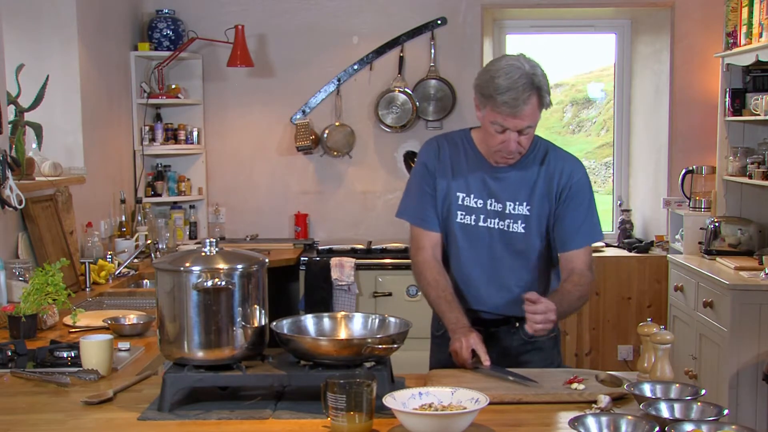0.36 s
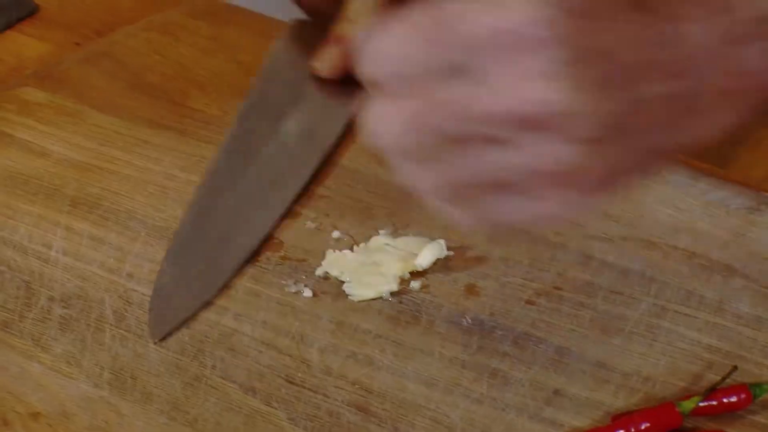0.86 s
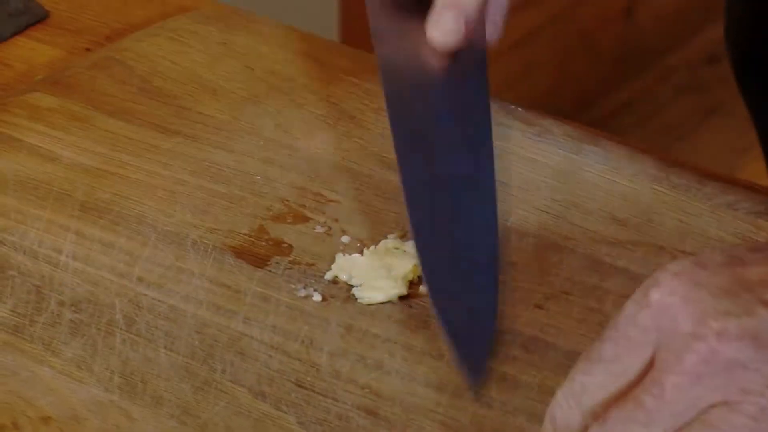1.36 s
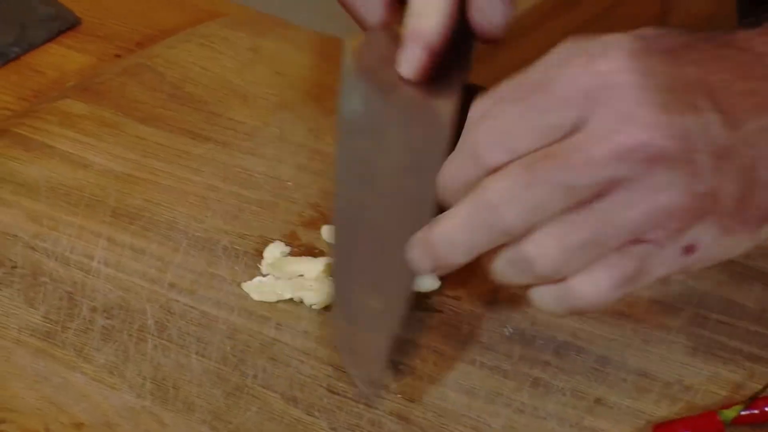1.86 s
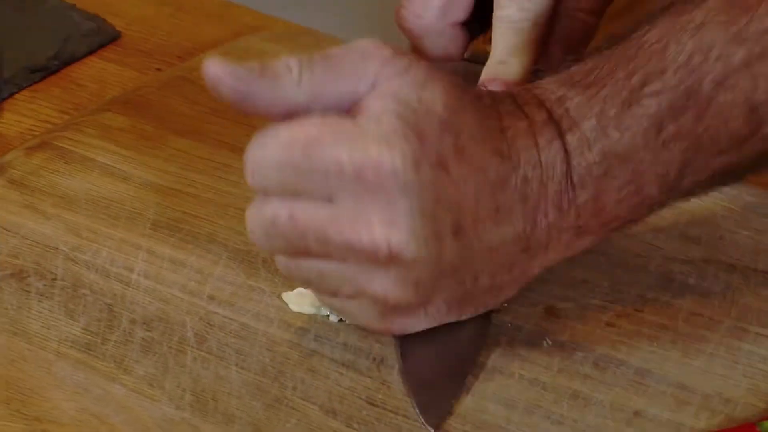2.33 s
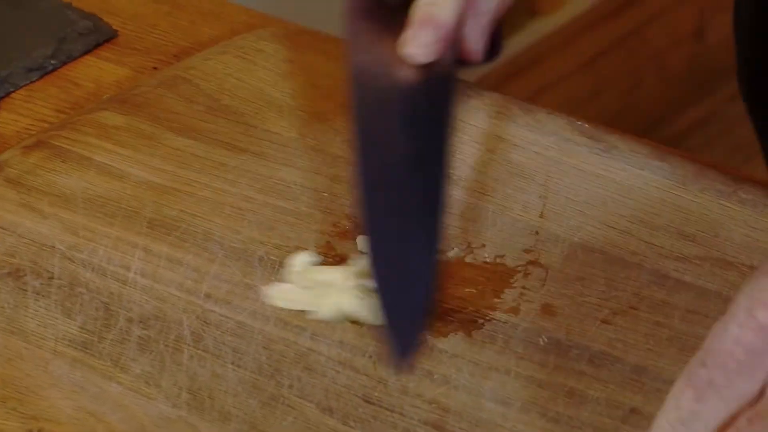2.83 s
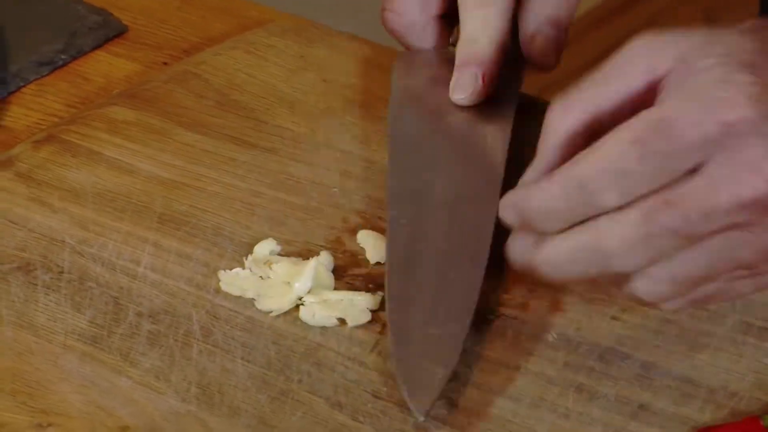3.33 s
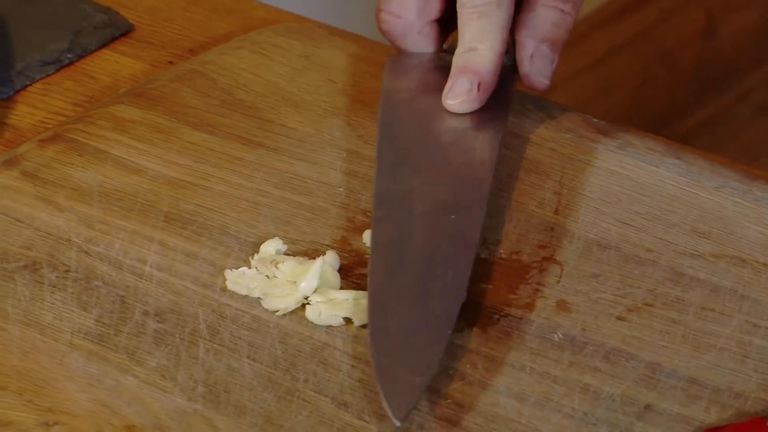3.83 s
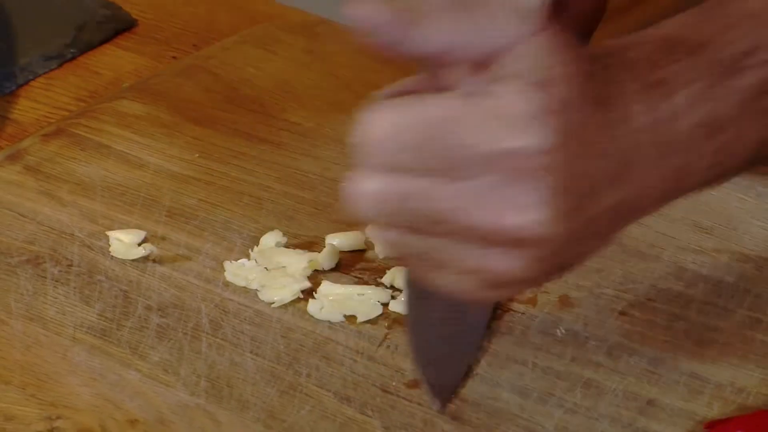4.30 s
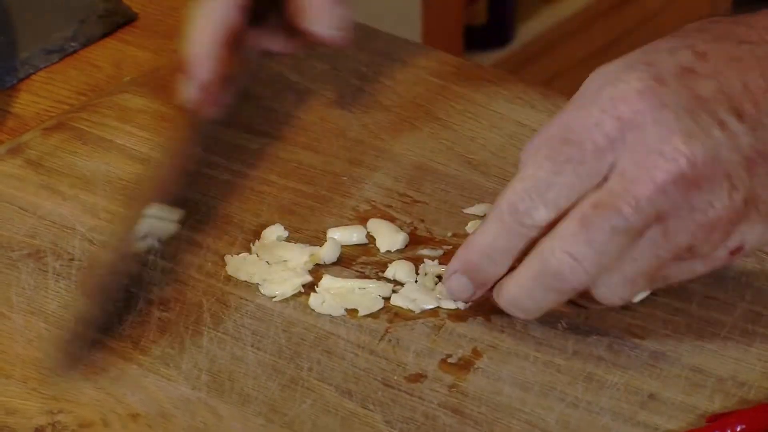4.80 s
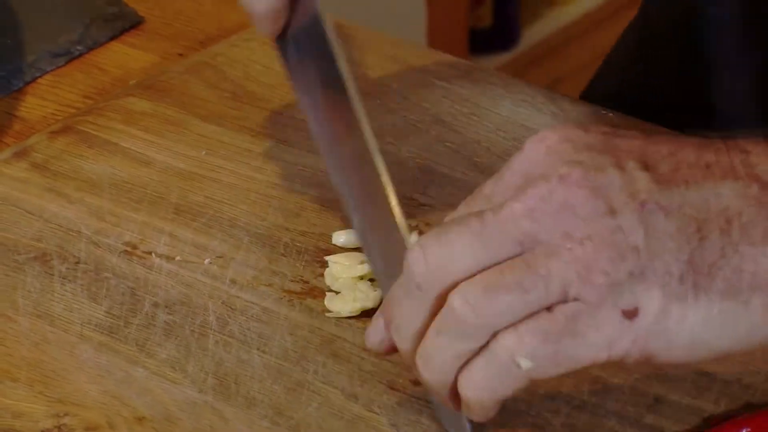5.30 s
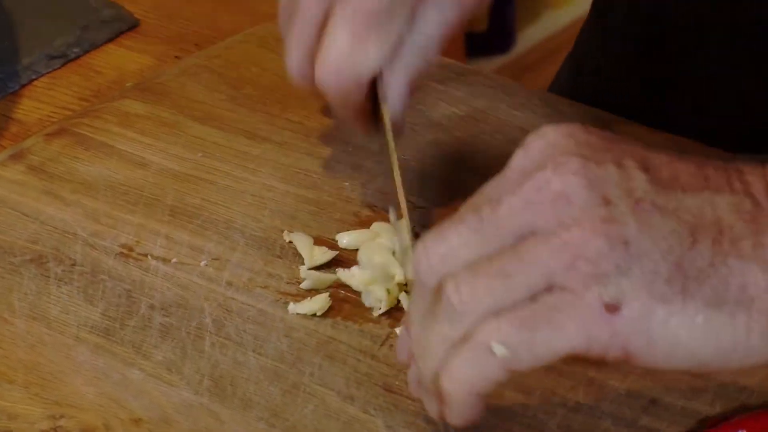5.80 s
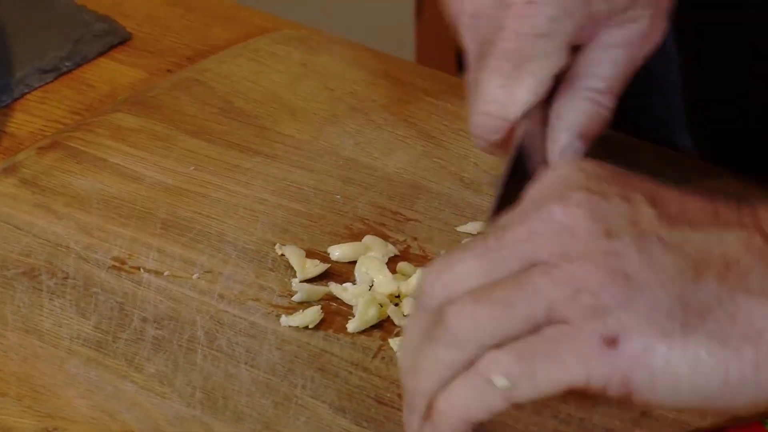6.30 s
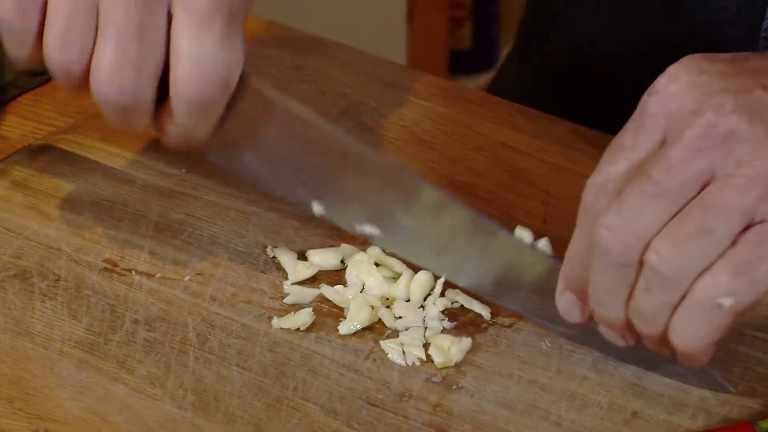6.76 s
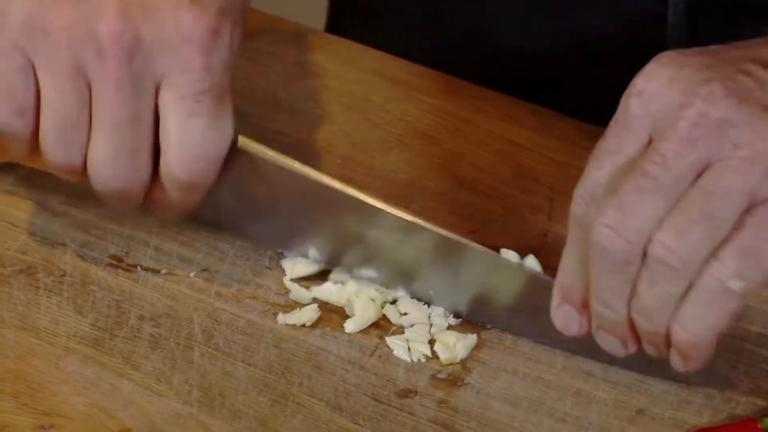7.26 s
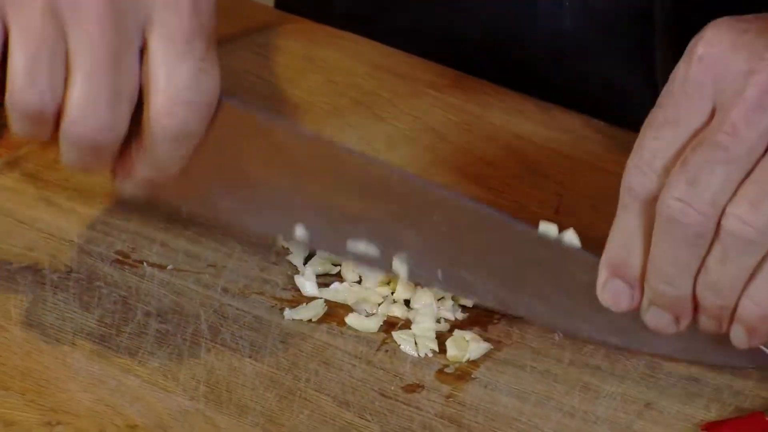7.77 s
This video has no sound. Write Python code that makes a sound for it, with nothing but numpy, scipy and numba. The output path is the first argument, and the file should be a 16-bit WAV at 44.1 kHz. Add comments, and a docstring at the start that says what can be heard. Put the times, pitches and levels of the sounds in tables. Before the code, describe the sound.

A quiet kitchen with faint hiss, miked close, with only slight reflections from the walls. A soft touch at 0.2 s, then at 0.64 s a fist slams the flat of a knife onto garlic: a loud crack and woody thump, metal bowls clinking brightly just after. Light taps at 0.9; a sharp bladed click and short scrape around 1.45-1.55. A second smash at 2.34, with bowl jingle, then a tap, a soft scrape near 2.9 and small quiet touches. The third smash lands at 4.2. A firm clack at 4.8 and gritty sliding of the edge from 4.85 to 5.15 follow as garlic is gathered. Chops knock at 5.5, 5.7, 6.0 and 6.36, with a tight cluster of clacks and a brief metallic scrape around 6.55-6.7. Five even, crisp chops run from 6.96 to 7.66, faint clinks among them, ending on a weak touch at 7.84.

```python
"""In a kitchen, a fist smashes garlic under the flat of a chef's knife, then the blade chops it on a wooden board.
Blows and touches mix crushing and clicking noise with fading tones of board, worktop and steel.
Nested bowls clink as bright noise and ringing; the sliding edge is uneven noise through the blade's resonances.
The walls echo it faintly over quiet room noise and wavering tones, and a look-ahead limiter holds the peaks."""
import sys
import numpy as np
from scipy import signal
from scipy.fft import rfft, irfft, next_fast_len
from scipy.io import wavfile
from scipy.ndimage import uniform_filter1d, minimum_filter1d
from numba import njit

SR = 44100
rng = np.random.default_rng(int(sys.argv[2]) if len(sys.argv) > 2 else 0)


def invert_db(level):
    """Linear amplitude ratio for a level in decibels (20 dB per decade), elementwise."""
    return 10 ** (np.asarray(level, dtype=float) / 20)


def wav_record(signal):
    """Record a signal, one row per channel, as 16-bit PCM in the file named by sys.argv[1]."""
    frames = np.transpose(np.atleast_2d(signal))
    bounded = np.clip(frames, -1, 1)
    # unit amplitude maps onto the largest positive 16-bit level
    quanta = np.round(bounded * 32767).astype(np.int16)
    wavfile.write(sys.argv[1], SR, quanta)


N = 347596  # length in samples

# Quiet room noise: f/Hz, level per Hz/dB (only the shape counts)
AIR_SHAPE = [(15, -95), (25, -19.5), (127, 4), (309, -8), (344, -4.5), (545, -19.5), (2110, -18.5),
             (2480, -18), (2760, -16.5), (7310, -23.5), (9070, -19.5), (16000, -36.5)]
# Faint wavering tones: f/Hz, level/dB
HUM_TONES = [(134.6, -85), (2778, -82.5), (4194, -81), (4990, -86), (9060, -81.5)]
# Blade or fingers touching down: t/s, whole touch/dB, worktop boom/dB, board thump/dB, treble/dB (-11 is neutral)
TOUCHES = [(0.232, -42, -22, -12, -12), (0.855, -19.5, -39.5, -24, -2), (0.882, -19, -21, -22, 4),
           (1.401, -45, -20, -19, -18), (1.447, -6.5, -33, -31, 6.5), (1.677, -28.5, -40, -21.5, -11),
           (1.946, -60, 7, -5, -19), (2.541, -15, -25, -44, -4.5), (2.703, -44.5, 0, -3.5, -12),
           (2.733, -32, -34, -40, -48.5), (3.117, -34.5, -39, -13, -9), (3.389, -41.5, -4, -8, -7),
           (3.957, -66, 18, 2, -9), (4.793, -4.5, -22.5, -25.5, -11), (5.085, -27, -35, -32, 8),
           (5.105, -20.5, -30, -31, 7), (5.309, -43, -33, -11, 1), (5.325, -41, -15, -20, 2),
           (5.83, -20, -9.5, -11, 4), (6.183, -19, -41, -21.5, -4.5), (6.541, -6, -24, -18.5, -18.5),
           (6.586, -9.5, -21.5, -23, -6), (6.608, -8, -24, -25, -67), (7.836, -37, -15, -9.5, -43)]
# Click of a touch: f/Hz, level per Hz/dB
TOUCH_COLOUR = [(59, -17), (100, -9), (1610, 11), (2630, 13.5), (3190, 9.5), (4770, 0.5), (7290, -7.5),
                (14100, -24.5), (16000, -49)]
# Tones of the worktop: f/Hz, level/dB, time to fade 60 dB/s
WORKTOP_TONES = [(135.6, -1.5, 0.16), (80.8, -29, 0.54)]
# Tones of the wooden board: f/Hz, level/dB before the edge's tilt, time to fade 60 dB/s
BOARD_TONES = [(189.8, -9, 0.29), (247.7, -6.5, 0.14), (289.7, -15, 0.29), (359, -16.5, 0.22),
               (417, -0.5, 0.09), (466.4, -2, 0.056), (594.5, -8.5, 0.073)]
# Pans and blade set ringing: f/Hz, level/dB, time to fade 60 dB/s
STEEL_TONES = [(1104, -17, 1.77), (1913, 0, 0.62), (2140, -9.5, 0.44), (2240, -24, .1), (2560, -10, 1.3),
               (2710, -13.5, 1), (3290, -15.5, 1.3), (3330, -13.5, 0.97), (3880, -7, 0.56),
               (4380, -15, 0.87), (5056, -13.5, 0.63)]
# Board, worktop and dishes shaking on after a blow: f/Hz, time to fade 60 dB/s, relative level/dB
SHAKING = [(270, 0.65, 13.5), (429, 0.47, 10), (980, 0.46, 3), (2125, 0.53, 2.5), (4120, 0.76, -3),
           (7670, 1, -4), (14000, 0.17, 14)]
# Garlic being crushed: f/Hz, level per Hz/dB
CRUSH_COLOUR = [(300, -9.5), (1500, -1), (3000, -4.5), (7000, -3.5), (12000, -13), (16000, -49)]
# Dense kitchen echo: f/Hz, time to fade 60 dB/s, relative level/dB
ROOM_ECHO = [(250, .4, -20), (500, .45, -20), (1000, .5, -20), (2000, .5, -20), (4000, .5, -20),
             (8000, .4, -20), (14000, .3, -22)]
# First echo: delay/ms, level/dB, heard above f/Hz
WALL_ECHO = [(6, -12, 200)]
# Fist on the flat blade: t/s, worktop boom/dB, board thump/dB, treble/dB (-11 is neutral), steel ringing/dB
FIST_BLOWS = [(0.643, -23, -19, -12.5, -48), (2.338, -22, -27.5, -13.5, -46.5),
              (4.198, -17, -20.5, -15, -41)]
# Crack of a smash: f/Hz, level per Hz/dB
SMASH_COLOUR = [(180, -10), (300, -11.5), (1410, -9.5), (2280, -3), (4830, -7.5), (5430, -5.5),
                (11700, -17), (16000, -31.5)]
# Further bowl clinks, each at its own moment, one very faint: t/s, level/dB
FURTHER_CLINKS = [(0.8045, -54), (2.4578, -34), (4.342, -32), (5.7458, -33), (5.894, -33), (5.9883, -36),
                  (6.2891, -36), (6.4622, -30.5), (6.567, -29), (7.2439, -36), (7.266, -29.5)]
# Tones of the bowls: f/Hz, level/dB, time to fade 60 dB/s
BOWL_TONES = [(4398, 0, .5), (5146, -2.5, 0.41), (5846, -6, 0.21), (5700, -8, 0.29), (6352, -18, 0.42),
              (6660, 5, .15), (7215, -2.5, 0.27), (8200, -4.5, 0.2), (9001, -5.5, 0.35), (10200, -11, .25),
              (10100, -7, 0.29), (11036, -14.5, 0.24), (12200, -16, .2), (12460, -22, .2)]
# Edge sliding over board and garlic; near 4.63-4.755 s, faint dying steel ring, made the same way:
# t of the top/s, swell/s, fade/s, level/dB, treble against level/dB
# swell and fade each span 20 dB and last at least 0.003 s
STROKES = [(0.9, 0.0095, 0.023, -53.5, 21), (1.02, 0.087, 0.15, -47, -3.5), (1.127, 0.059, 0.082, -54, -31),
           (1.285, 0.03, 0.049, -71.5, 13.5), (1.405, 0.011, .09, -66, -23),
           (1.45, 0.0026, 0.014, -19.5, -6), (1.48, 0.026, 0.066, -33.5, -14),
           (1.535, 0.067, .05, -30, -13.5), (1.62, .05, 0.17, -47.5, -14), (1.79, 0.027, 0.023, -84.5, 17),
           (2.57, 0.051, 0.2, -49.5, -2), (2.746, 0.017, 0.07, -51, -23), (2.908, .11, 0.067, -27, -20),
           (3.02, 0.092, 0.084, -57, -8), (3.13, 0.019, 0.1, -61, 0), (3.44, 0.023, 0.095, -70, 4),
           (4.501, 0.068, 0.082, -49.5, 6), (4.63, .07, 0.17, -58.5, 0), (4.755, 0.026, 0.016, -65, -21),
           (4.871, 0.056, 0.091, -33, 0), (4.95, 0.13, 0.037, -28, -4.5), (5.01, 0.054, 0.088, -49, -3),
           (5.137, 0.063, 0.026, -35, 4), (5.3, 0.15, 0.048, -61.5, 0.5), (5.47, 0.15, 0.034, -56, 0),
           (6.3, 0.023, 0.052, -51.5, 3.5), (6.64, 0.033, 0.05, -41, 12.5),
           (6.684, 0.072, 0.046, -32.5, 4.5)]
# A hand pushing over the board, heard as rumble only: t/s, swell/s, fade/s, level/dB
HAND_PUSHES = [(5.208, 0.089, 0.044, -41)]
# Blade resonances: f/Hz, width/Hz (held to 45-110), level/dB
BLADE_TONES = [(1850, 70, -1), (2210, 60, -2), (2360, 110, -1), (2710, 61, -1), (3110, 60, -4),
               (3770, 92, -8), (4480, 140, -6), (5160, 42, -6), (5340, 25, -6), (6050, 110, -10),
               (6940, 110, -12), (7420, 60, -9), (9420, 72, -12)]
# Middle of the blade's two squeaks: f/Hz
SQUEAK_PITCHES = (2390, 4240)
# Drift of each squeak: share of its pitch
SQUEAK_DRIFTS = (0.14, 0.051)
# Rasp of the edge: f/Hz, level per Hz/dB
RASP_COLOUR = [(240, -57.5), (400, -29), (979, -8.5), (1230, 4.5), (1600, -18.5), (2290, -41), (3580, -4),
               (9760, -6), (16000, -40.5)]
# Edge down through the garlic onto the board: t/s, worktop boom/dB, board thump/dB, treble/dB (-11 is neutral), contact/ms
EDGE_BLOWS = [(5.496, -27, -25, -16.5, 11.4), (5.676, -23.5, -29.5, -15, 2.8),
              (6.002, -19, -25.5, -17, 8.7), (6.36, -17.5, -20.5, -14, 19.5),
              (6.957, -25, -23.5, -16.5, 12.5), (7.136, -23, -23, -18, 10.3), (7.307, -29, -27, -17.5, 8.5),
              (7.48, -28.5, -24.5, -17, 8.6), (7.66, -29, -22.5, -19, 12)]
# Knock of a chop: f/Hz, level per Hz/dB
CHOP_COLOUR = [(59, -60), (100, -15), (535, 12.5), (784, 19), (1550, 20), (2420, 16.5), (3780, 13),
               (5650, 9.5), (8280, -2.5), (16000, -44)]


def unit(x):
    """Scale to rms 1."""
    return x / np.sqrt(np.mean(x ** 2))


def colour(x, points):
    """Shape the loudness of each pitch by (f/Hz, level/dB) points."""
    hz, db = np.transpose(points)
    n = next_fast_len(x.shape[-1])
    f = np.maximum(np.arange(n // 2 + 1) * SR / n, 1)
    gain = invert_db(np.interp(np.log(f), np.log(hz), db))
    return irfft(rfft(x, n) * gain, n)[..., :x.shape[-1]]


def band(x, hz, width_hz):
    """One resonance, which passes its centre pitch unchanged."""
    return signal.lfilter(*signal.iirpeak(hz, hz / max(width_hz, 5), SR), x)


def walk(rate):
    """Smooth random drift with a new aim `rate` times a second; spread near 1."""
    hold = int(SR / rate)
    steps = np.repeat(rng.standard_normal(N // hold + 1), hold)
    return 1.35 * uniform_filter1d(uniform_filter1d(steps, hold), hold)[:N]


def air():
    """Room noise whose bass wavers, plus narrow bands of noise heard as faint tones."""
    noise = unit(colour(rng.standard_normal(N), AIR_SHAPE))
    bass = signal.sosfilt(signal.butter(2, 450, fs=SR, output="sos"), noise)
    wavering_bass = bass * invert_db(3 * walk(5.3))
    tones = np.zeros(N)
    for hz, db in HUM_TONES:
        tones += invert_db(db + 2 * walk(4.4)) * unit(band(rng.standard_normal(N), hz, 29))
    return invert_db(-64) * (noise - bass + wavering_bass) + tones


def ring(modes, t, scatter_db, rattle, detune=0.0088, size=400):
    """Fading tones; each blow wakes them unevenly, and loose contact makes them rattle instead of sing."""
    hz, db, t60 = np.transpose(modes)[:, :, None]
    uneven, off_pitch = rng.standard_normal((2, len(modes), 1))
    wobble = uniform_filter1d(rng.standard_normal((len(modes), len(t))), size=size, axis=1)
    shake = 1 + rattle * unit(wobble)
    fade = np.exp(-np.log(1000) * t / np.clip(t60, .02, 2))
    tones = np.sin(2 * np.pi * hz * (1 + detune * off_pitch) * t)
    return (invert_db(db + scatter_db * uneven) * shake * fade * tones).sum(axis=0)


def fading(bands, t):
    """Noise that dies at its own pace in each octave-wide band."""
    out = 0
    for hz, t60, db in bands:
        limits = (hz / np.sqrt(2), min(hz * np.sqrt(2), SR * 9 / 20))
        octave = signal.butter(2, limits, "band", fs=SR, output="sos")
        noise = signal.sosfilt(octave, rng.standard_normal(len(t)))
        out = out + invert_db(db) * noise * np.exp(-np.log(1000) * t / t60)
    return out


def blows(events, spectrum, crack_db, clatter_db, crush_db, crush_ms, edge_db):
    """Garlic crushes just before each blow, a click and rattle follow the contact, then all it shook rings on."""
    out, t = np.zeros(N + SR), np.arange(SR * 3 // 5) / SR
    short_ms = t[:2048] * 1000
    lead = 256  # samples of room ahead of the click for its coloured noise
    # a hard narrow edge wakes the board's higher tones more than a soft fist: edge_db per octave
    board = [(hz, db + edge_db * np.log2(hz / BOARD_TONES[0][0]), t60) for hz, db, t60 in BOARD_TONES]
    tail_off = np.clip((t[-1] - t) * 12, 0, 1)
    for s, db, boom_db, thump_db, treble_db, contact_ms, steel_db in events:
        # the treble setting comes in between 2500 and 5000 Hz
        tilt = [(hz, g + (treble_db + 11) * np.clip(np.log2(hz / 2500), 0, 1)) for hz, g in spectrum]
        unevenness = 2 * rng.standard_normal((2, 2048 // 16)).repeat(16, axis=1)
        grit = rng.standard_normal((2, 2048)) * invert_db(unevenness)

        contact = grit[0] * np.exp(-(short_ms / max(contact_ms, .3)) ** 2)
        contact[0] = invert_db(12)  # the click
        crack = invert_db(crack_db) * unit(colour(np.roll(contact, lead), tilt))
        crush = invert_db(crush_db) * unit(colour(grit[1], CRUSH_COLOUR)) * np.exp(-(short_ms / crush_ms) ** 2)

        boom = invert_db(boom_db) * ring(WORKTOP_TONES, t, 1, 0)
        thump = invert_db(thump_db) * ring(board, t, 2.5, 1 / 3)
        # the harder the board jumps, the more the things on it shake
        clatter = invert_db(clatter_db + .5 * thump_db) * unit(colour(fading(SHAKING, t), tilt))
        steel = invert_db(steel_db) * ring(STEEL_TONES, t, 4.1, 0.95, detune=0, size=1200)
        body = (boom + thump + clatter) * (1 - np.exp(-t / 0.0058)) + steel

        i = int(s * SR)
        out[i - 2048:i] += invert_db(db) * crush[::-1]  # reversed, so it grows towards the blow
        out[i - lead:i - lead + 2048] += invert_db(db) * crack
        out[i:i + len(t)] += invert_db(db) * body * tail_off
    return out[:N]


def taps():
    """Blade or fingers touch down: short contacts, each with its own strength."""
    contact_ms, steel_db = 4.44, -52.5
    return blows([(*row, contact_ms, steel_db) for row in TOUCHES], TOUCH_COLOUR,
                 crack_db=-20.5, clatter_db=-27.5, crush_db=-47, crush_ms=4.5, edge_db=2.5)


def kitchen(x):
    """Direct sound, a near wall's echo and a faint dense tail of fading noise."""
    t = np.arange(SR * 3 // 5) / SR
    response = fading(ROOM_ECHO, t) * (1 - np.exp(-t / 0.0072)) / np.sqrt(SR / 28)
    response[0] = 1  # direct sound
    for ms, db, hz in WALL_ECHO:
        echo = signal.lfilter(*signal.butter(1, hz, "high", fs=SR), t[:256] == 0)
        response[ms * SR // 1000:][:256] += invert_db(db) * echo
    return signal.fftconvolve(x, response)[:N]


def smashes():
    """The fist is soft and broad, so it wakes the board's higher tones less."""
    level_db, contact_ms = 10, 11.2
    return blows([(s, level_db, *wood, contact_ms, steel) for s, *wood, steel in FIST_BLOWS], SMASH_COLOUR,
                 crack_db=-19.5, clatter_db=-35.0, crush_db=-49, crush_ms=3.3, edge_db=-1.5)


def clinks():
    """Nested bowls hop after each smash and chop: a first clink, then three weaker ones at chance moments."""
    hop_s, settle_s = .027, 0.24
    out = list(FURTHER_CLINKS)
    for table, hop_db in ((FIST_BLOWS, -18), (EDGE_BLOWS, -27.5)):
        for s, *_ in table:
            out.append((s + hop_s, hop_db))
            for _ in range(3):
                moment = s + hop_s + settle_s * rng.random()
                out.append((moment, -42.5 + 3 * rng.standard_normal()))
    return out


def bowls():
    """Each clink is a bright tick and a short fizz of noise, with the bowls' tones ringing."""
    out, t = np.zeros(N + SR), np.arange(SR // 3) / SR
    bright = signal.butter(2, (5500, 11500), "band", fs=SR, output="sos")
    for s, db in clinks():
        tick_and_fizz = np.exp(-t / 0.0029) + invert_db(-26) * np.exp(-t / 0.028)
        contacts = signal.sosfilt(bright, rng.standard_normal(len(t))) * tick_and_fizz
        ringing = ring(BOWL_TONES, t, 3.3, 0.85, detune=.002, size=500)
        out[int(s * SR):][:len(t)] += invert_db(db) * (invert_db(-24.5) * ringing + invert_db(-7) * contacts)
    return out[:N]


def hump(t, s, swell_s, fade_s):
    """Level in dB against the top of a stroke, which swells and then fades."""
    before = (s - t) / max(swell_s, .003)
    after = (t - s) / max(fade_s, .003)
    return -20 * np.where(t < s, before, after).clip(0, 9) ** 1.4  # power 1 is pointed, 2 rounded


@njit
def sweep(x, hz, sharp):
    """Resonance whose pitch moves, worked out sample by sample."""
    y, b, l = np.empty(len(x)), 0., 0.  # b, l: what the filter remembers
    for i in range(len(x)):
        g = np.tan(np.pi * hz[i] / SR)
        v = (b + g * (x[i] - l)) / (1 + g * (g + 1 / sharp))
        b, l, y[i] = 2 * v - b, l + 2 * g * v, v / sharp
    return y


def scrapes():
    """Dense uneven catches, as of the edge on wood grain, drive the blade's resonances and the board."""
    t = np.arange(N) / SR
    low_level, high_level, rumble_level = np.zeros((3, N))
    for s, swell_s, fade_s, db, treble_db in STROKES:
        on = slice(int((s - 2 * swell_s) * SR), int((s + 3 * fade_s) * SR))
        stroke = invert_db(hump(t[on], s, swell_s, fade_s))
        low_level[on] += invert_db(db) * stroke
        high_level[on] += invert_db(db + treble_db) * stroke
        # 12 dB under a -47.5 dB stroke; it grows more slowly than the rasp
        rumble_level[on] += invert_db(db - 12 - 0.69 * (db + 47.5)) * stroke
    for s, swell_s, fade_s, db in HAND_PUSHES:
        rumble_level += invert_db(db + hump(t, s, swell_s, fade_s))

    catches = rng.standard_normal(N) * invert_db(2.48 * rng.exponential(size=N) + 2.65 * walk(150))
    # grip and pressure change which resonances speak from moment to moment
    blade = np.zeros(N)
    for hz, width_hz, db in BLADE_TONES:
        blade += invert_db(db + 4 * walk(25)) * unit(band(catches, hz, np.clip(width_hz, 45, 110)))
    squeaks = [unit(sweep(catches, hz * np.exp(share * walk(15)), 22.))
               for hz, share in zip(SQUEAK_PITCHES, SQUEAK_DRIFTS)]
    squeal = squeaks[0] + invert_db(-4) * squeaks[1]
    rasp = invert_db(-8) * unit(colour(catches, RASP_COLOUR)) + unit(blade) + invert_db(-4) * unit(squeal)

    low = signal.sosfilt(signal.butter(2, 3500, "low", fs=SR, output="sos"), rasp)
    high = signal.sosfilt(signal.butter(2, 3500, "high", fs=SR, output="sos"), rasp)
    rumble = signal.sosfilt(signal.butter(2, (110, 700), "band", fs=SR, output="sos"), catches)
    # the minus sign lets the two halves join without a notch at 3500 Hz
    return low_level * unit(low) - high_level * unit(high) + rumble_level * unit(rumble)


def chops():
    """The hard narrow edge wakes the board's higher tones more."""
    level_db, steel_db = 7.5, -50
    return blows([(s, level_db, *rest, steel_db) for s, *rest in EDGE_BLOWS], CHOP_COLOUR,
                 crack_db=-27.5, clatter_db=-34.5, crush_db=-44.5, crush_ms=11.4, edge_db=6.0)


def scene():
    """Everything at the board sounds in the kitchen, over the room noise."""
    at_board = taps() + smashes() + bowls() + scrapes() + chops()
    return (kitchen(at_board) + air())[None]


@njit
def recover(gain, rate):
    """Follow falls of the gain at once and rise slowly."""
    out, g = np.empty(len(gain)), 1.
    for i in range(len(gain)):
        g = min(gain[i], g + rate * (gain[i] - g))
        out[i] = g
    return out


def band_limit(x):
    """A steep low-pass at the top of the band."""
    return signal.sosfilt(signal.butter(12, 16480, fs=SR, output="sos"), x)


def record(dry):
    """The microphone drops the deepest bass; the limiter ducks just ahead of peaks; the top is cut."""
    ceiling_db, ahead_ms, release_ms, top_hz = -8.5, 0.85, 9.1, 15000
    x = signal.sosfilt(signal.butter(3, 70, "high", fs=SR, output="sos"), dry)
    ahead = int(ahead_ms * SR / 1000)
    need = np.minimum(1, invert_db(ceiling_db) / (np.abs(x[0]) + 1e-9))
    gain = minimum_filter1d(need, 2 * ahead)
    gain = uniform_filter1d(recover(gain, 1000 / (release_ms * SR)), size=64)
    mix = signal.sosfilt(signal.ellip(8, .2, 70, top_hz, fs=SR, output="sos"), x * gain)
    return band_limit(mix)


dry = scene()
out = record(dry)
wav_record(out)
```